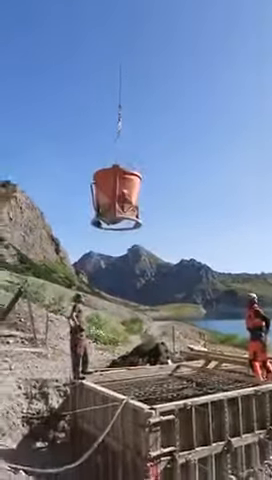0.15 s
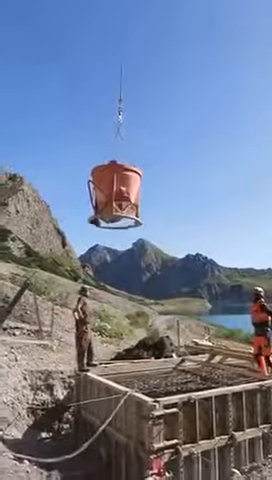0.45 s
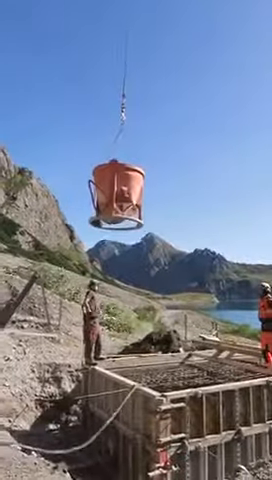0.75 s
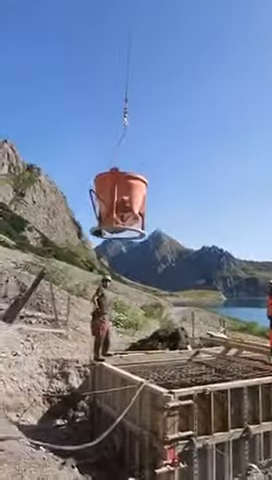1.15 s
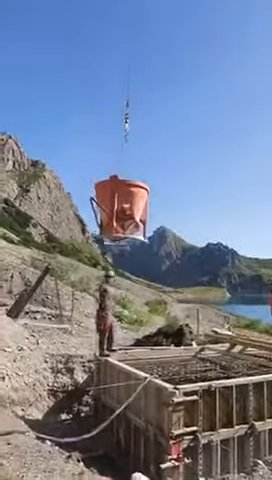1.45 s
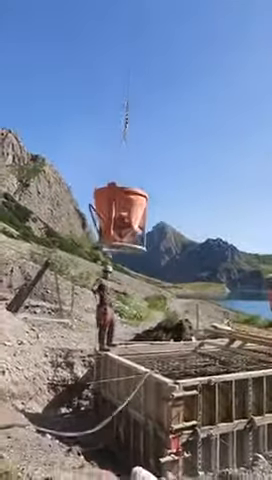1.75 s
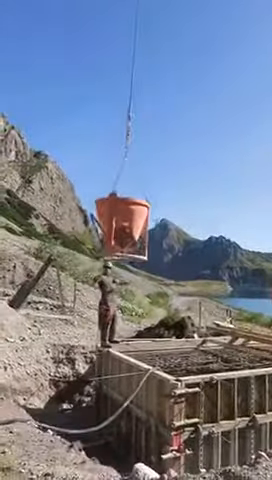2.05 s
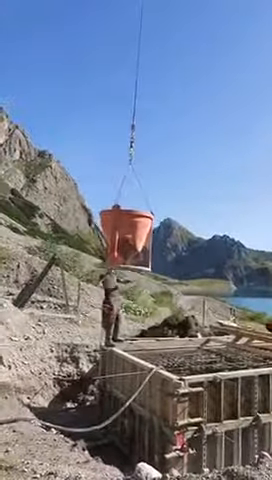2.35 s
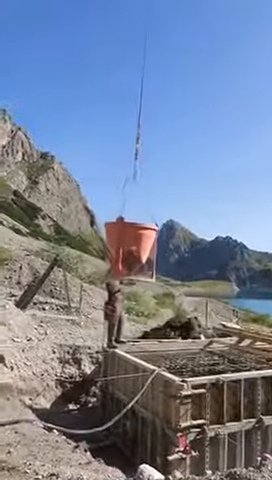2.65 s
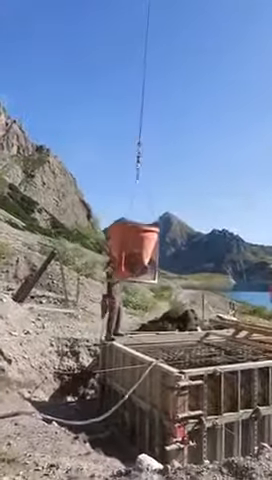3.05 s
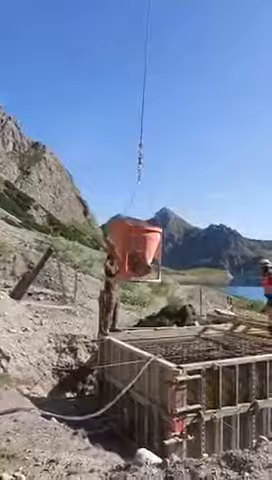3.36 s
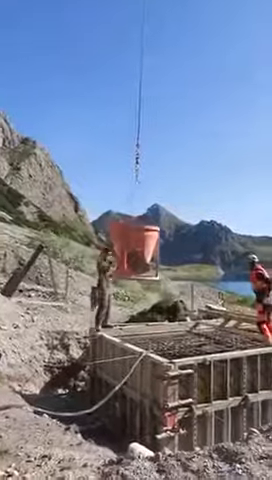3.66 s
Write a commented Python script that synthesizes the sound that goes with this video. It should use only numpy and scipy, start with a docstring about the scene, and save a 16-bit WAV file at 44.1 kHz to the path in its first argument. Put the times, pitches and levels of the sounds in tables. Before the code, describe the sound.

A helicopter hovers nearby throughout, a loud, crackly midrange roar fluttering about twenty times a second, with a short echo off rough ground. Downwash hits the phone at the start; low, wide wind buffeting follows from 0.15 to 0.7 s. Hard slaps stand out around 1.2 and 1.4 s. Gusts and hiss strengthen at 2-2.7 s, then dense, heavy slaps dominate until the end, with another brief gust near 3.6.

```python
"""A helicopter hovers over rough ground, heard at a hand-held phone.
Throughout, blade passes swell a crackly roar with fixed bright bands, hard slaps cut in, the ground echoes both,
and a wide hiss lies over all. From about 0.15 to 0.68 s low wind noise beats the two microphone ports unlike each
other; then the bass is held in the middle as a rumble. Downwash gusts tear at the phone at the start and again from
about 1 s; the hiss is strongest between 2 and 2.7 s. Sources are coloured noise and random cracks, moved in level."""
import sys
import numpy as np
from scipy import signal
from scipy.fft import rfft, irfft, next_fast_len
from scipy.io import wavfile
from scipy.ndimage import uniform_filter1d, map_coordinates

SR = 44100
rng = np.random.default_rng(int(sys.argv[2]) if len(sys.argv) > 2 else 0)


def level_to_linear(level):
    """Convert decibel levels to linear amplitude factors, elementwise."""
    exponent = np.asarray(level, float) / 20
    return 10 ** exponent


def store_pcm(level_fs):
    """Save levels as 16-bit WAV."""
    pcm = np.round(np.clip(level_fs, -1, 1) * 32767).astype(np.int16)
    wavfile.write(sys.argv[1], SR, np.atleast_2d(pcm).T)


N = 167139
SIZE = next_fast_len(N)
HZ = np.maximum(np.arange(SIZE // 2 + 1) * SR / SIZE, 1)
T = np.arange(N) / SR

# Spectrum of the rotor roar, with its bright bands. Each row: frequency in Hz, relative density in dB per Hz.
ROAR_COLOUR = [(35, -39), (60, -22.5), (150, -20.5), (290, -1), (450, 0), (700, 2.5), (800, -3.5),
               (900, -11.5), (1050, -7), (1165, -3.5), (1280, -8.5), (1440, -15.5), (1600, -10.5),
               (1700, -8.5), (1930, -16.5), (2190, -10.5), (2350, -16.5), (2500, -20), (2750, -19),
               (3350, -22.5), (5000, -35), (8300, -52.5), (11000, -73)]


def curve(table, axis=1):
    """One column of a table, joined by straight lines in time."""
    rows = np.array(table)
    return np.interp(T, rows[:, 0], rows[:, axis])


def over_hz(table, hz):
    """A (Hz, value) table read on a log-frequency axis."""
    rows = np.array(table)
    return np.interp(np.log(hz), np.log(np.maximum(rows[:, 0], 1)), rows[:, 1])


def unit(x):
    """Scaled to rms 1."""
    return x / np.sqrt(np.mean(x ** 2))


def walk(rate_hz):
    """Random levels held 1 / rate_hz seconds and slewed twice; rms 1."""
    hold = max(int(SR / rate_hz), 2)
    steps = np.repeat(rng.standard_normal(N // 20)[:N // hold + 1], hold)
    slewed = uniform_filter1d(uniform_filter1d(steps, hold), hold)
    return unit(slewed[:N])


def cracks():
    """Sparse random clicks of random size and sign, giving a crackly grain; rms 1."""
    cracks_per_s = 900
    chance = rng.random((N, 2))
    struck = chance[:, 0] < cracks_per_s / SR
    size = np.sqrt(-np.log(1 - chance[:, 1])) * struck
    return unit(size * rng.choice([-1, 1], N))


def noise(colour, move_db, extra=((1, 0),), crack_db=-60):
    """Noise and cracks, coloured to rms 1, then tilted by extra; move_db(Hz) moves each half-octave band."""
    source = rng.standard_normal(N) + level_to_linear(crack_db) * cracks()
    spectrum = rfft(source, SIZE) * level_to_linear(over_hz(colour, HZ))
    rms = np.sqrt(np.mean(irfft(spectrum, SIZE) ** 2))
    spectrum = spectrum * level_to_linear(over_hz(extra, HZ)) / rms
    out = 0
    for hz in 18 * 2. ** np.arange(0, 10, .5):
        share = np.clip(1 - 2 * abs(np.log2(HZ / hz)), 0, 1)
        out = out + irfft(spectrum * share, SIZE)[:N] * level_to_linear(move_db(hz))
    return out


def echoed(x):
    """Sound plus its close reflection off rough ground, dulled; the delay wanders as the phone sways."""
    # Ground reflections. Each row: delay in ms, level in dB, rms delay wander in ms, low-pass corner in Hz.
    echoes = [(8.75, -5, 0.15, 1380)]
    out = x
    for delay_ms, db, sway_ms, top_hz in echoes:
        wander_ms = delay_ms + sway_ms * walk(0.98)
        low_pass = signal.butter(2, top_hz, fs=SR, output="sos")
        dull = signal.sosfiltfilt(low_pass, x)
        late = map_coordinates(dull, [(T - wander_ms / 1000) * SR], order=1, mode="mirror")
        out = out + level_to_linear(db) * late
    return out


def hiss():
    """Smooth treble noise, stronger in the side than in the middle; a shared part leans it right."""
    # Hiss level. Each row: time in seconds, level in dB.
    hiss_levels = [(0, -52), (.2, -48.5), (.43, -68), (.62, -47.5), (.67, -58), (.75, -50.5), (1.05, -51.5),
                   (1.1, -49), (1.5, -43.5), (1.9, -42.5), (2.1, -38.5), (2.35, -37), (2.5, -39),
                   (2.64, -37), (2.68, -42), (3.3, -47), (3.6, -49), (3.79, -42.5)]
    # Hiss spectrum. Each row: frequency in Hz, relative density in dB per Hz.
    hiss_colour = [(1500, -16), (3000, -2), (4500, 0), (6000, -3), (8000, -6), (9500, -6), (11000, -4),
                   (11700, -8)]
    # Middle tilt. Each row: frequency in Hz, gain over the hiss spectrum in dB.
    mid_tilt = [(2500, -14), (4000, -4.5), (6000, -4), (8000, -4.5), (10000, -10)]
    lean = 0.23  # share of the side subtracted from the middle

    def move(hz):
        return 1.5 * walk(11)

    gain = level_to_linear(curve(hiss_levels))
    side = noise(hiss_colour, move)
    mid = noise(hiss_colour, move, mid_tilt) - lean * side
    return gain * mid, gain * side


def rumble():
    """Low wind noise in the middle, fading in over 30 ms once the bass is held there."""
    # Rumble level. Each row: time in seconds, level in dB.
    rumble_levels = [(.7, -47), (.85, -54), (1., -50), (1.08, -42.5), (1.3, -40.5), (1.6, -41.5),
                     (1.8, -34.5), (2.1, -40.5), (2.35, -36.5), (2.55, -37.5), (2.75, -38), (3., -44.5),
                     (3.2, -46.5), (3.5, -45), (3.79, -48)]
    # Rumble spectrum. Each row: frequency in Hz, relative density in dB per Hz.
    rumble_colour = [(12, -37), (30, -21), (60, -11), (150, 4.5), (250, -4), (330, -13), (600, -56.5)]
    fade = np.clip((T - rumble_levels[0][0]) / .03 + 1, 0, 1)
    return fade * level_to_linear(curve(rumble_levels)) * noise(rumble_colour, lambda hz: 3 * walk(12))


def port_wind():
    """Low buffeting by wind that beats each port on its own: independent middle and side noise."""
    # Buffeting levels. Each row: time in seconds, side level in dB, middle level in dB.
    wind_levels = [(0, -36, -45), (.13, -30.5, -22), (.15, -24.5, -28), (.18, -15.5, -19.5),
                   (.19, -16, -20), (.295, -13.5, -23), (.305, -21.5, -28.5), (.4, -21, -26.5),
                   (.48, -18.5, -25), (.55, -13, -23), (.64, -15.5, -20.5), (.665, -20.5, -25),
                   (.675, -48, -48), (.72, -82, -74.5)]
    # Side spectrum. Each row: frequency in Hz, relative density in dB per Hz.
    side_colour = [(15, -43), (25, -25.5), (149, 0), (287, -1), (468, -5), (555, -12.5), (1510, -26),
                   (3040, -39.5), (4000, -60), (5200, -75), (8800, -120)]
    # Middle spectrum. Each row: frequency in Hz, relative density in dB per Hz.
    mid_colour = [(20, -14.5), (50, -3.5), (130, -4), (250, -4.5), (500, -13.5), (1500, -31), (5000, -68)]
    beat_db = 1.3 * walk(41)

    def move(hz):
        return beat_db + 0.97 * walk(25.4)

    mid = level_to_linear(curve(wind_levels, axis=2)) * noise(mid_colour, move)
    side = level_to_linear(curve(wind_levels)) * noise(side_colour, move)
    return mid, side


def gusts():
    """Downwash tearing over the phone: crackly body in the middle, brighter edge wide; both share a beat."""
    # Gust levels. Each row: time in seconds, body level in dB, edge level in dB.
    gust_levels = [(0, -16.5, -45.5), (.17, -18, -48.5), (.25, -44, -50.5), (.8, -42, -57.5),
                   (1.08, -34, -48), (1.3, -25, -40), (1.55, -28, -37.5), (1.65, -23, -44.5),
                   (1.85, -23, -43.5), (1.97, -23, -41.5), (2.04, -19, -39), (2.12, -17.5, -34.5),
                   (2.2, -18.5, -33), (2.3, -18.5, -37.5), (2.38, -30.5, -49.5), (2.45, -15, -33),
                   (2.525, -14.5, -29.5), (2.58, -20, -34), (2.64, -19.5, -24.5), (2.68, -29, -49),
                   (3., -31, -42.5), (3.3, -20, -43.5), (3.57, -27.5, -47.5), (3.62, -19.5, -27.5),
                   (3.67, -22, -42.5), (3.79, -20.5, -34)]
    # Body spectrum. Each row: frequency in Hz, relative density in dB per Hz.
    body_colour = [(25, -30), (80, -15.5), (200, -3), (400, 4), (750, -3), (1000, -6.5), (2000, -16),
                   (4000, -30.5), (8000, -56)]
    # Edge spectrum. Each row: frequency in Hz, relative density in dB per Hz.
    edge_colour = [(200, -33), (500, -1.5), (1000, -1), (1800, 3.5), (3000, 2), (5000, -8), (10000, -16.5)]
    # Edge in the middle. Each row: frequency in Hz, gain over the edge spectrum in dB.
    edge_mid_tilt = [(1000, 8), (3000, -2), (5000, -1), (8000, -8.5)]
    beat_db = 2.1 * walk(70)

    def move_body(hz):
        return beat_db + 1.15 * walk(18)

    def move_edge(hz):
        return beat_db + 5.4 * walk(110)

    edge_gain = level_to_linear(curve(gust_levels, axis=2))
    body = level_to_linear(curve(gust_levels)) * noise(body_colour, move_body, crack_db=-5.5)
    edge_mid = edge_gain * noise(edge_colour, move_edge, edge_mid_tilt, crack_db=-1.5)
    edge_side = edge_gain * noise(edge_colour, move_edge)
    return body + edge_mid, edge_side


def slaps():
    """Hard blade slaps: tight clusters of cracks and noise with a quick rise and exponential decay."""
    # Slaps. Each row: start in seconds, level in dB before the common trim, decay time constant in ms.
    slap_rows = [(0.029, -16.5, 4), (0.066, -8.5, 5.5), (0.146, -26.5, 5.4), (0.181, -13.5, 6),
                 (0.514, -16, 8.7), (0.609, -12.5, 4.5), (0.724, -20.5, 6), (0.764, -17.5, 6.8),
                 (0.865, -20, 6), (0.962, -11.5, 12), (1.022, -16.5, 10), (1.067, -24.5, 4.4),
                 (1.124, -14.5, 7.3), (1.218, -2.5, 5.5), (1.261, -20, 6), (1.318, -9.5, 6.6),
                 (1.358, -19, 6), (1.418, -2.5, 6), (1.463, -19, 3.5), (1.516, -13, 6.7), (1.57, -7.5, 9.8),
                 (1.809, -11.5, 5.3), (1.864, -25, 4.8), (1.966, -8, 6.9), (2.03, -14.5, 5.4),
                 (2.061, -22.5, 5.2), (2.152, -11, 5.1), (2.232, -15, 7.5), (2.343, -15, 6),
                 (2.439, -11, 10), (2.527, -3.5, 7.3), (2.586, -5, 3.8), (2.691, -15, 4.7),
                 (2.744, -11.5, 14), (2.791, -6.5, 8.1), (2.839, -15.5, 7.4), (2.895, -12.5, 4.4),
                 (2.936, -1.5, 7.8), (2.997, -15.5, 4.7), (3.036, -7, 5.2), (3.086, -11, 6.7),
                 (3.131, -5, 8.3), (3.181, -4.5, 6), (3.231, -22.5, 5.4), (3.294, -5.5, 7.6),
                 (3.394, -14, 7.1), (3.44, -18, 6), (3.495, -13, 6.6), (3.544, -8.5, 6), (3.597, 0, 5),
                 (3.657, -14.5, 5), (3.74, -9.5, 6)]
    # Slap tilt. Each row: frequency in Hz, gain over the roar spectrum in dB.
    slap_tilt = [(200, -11.5), (600, 0), (2000, 6.5), (5000, -0.5)]
    trim_db, rise_ms, crack_db = -4, 2.66, 3
    white = unit(rng.standard_normal(N) + level_to_linear(crack_db) * cracks())
    colour = level_to_linear(over_hz(ROAR_COLOUR, HZ) + over_hz(slap_tilt, HZ))
    tinted = unit(irfft(rfft(white, SIZE) * colour, SIZE)[:N])
    burst = np.zeros(N)
    for start_s, db, decay_ms in slap_rows:
        age_ms = np.maximum(T - start_s, 0) * 1000
        gate = (1 - np.exp(-age_ms / rise_ms)) * np.exp(-age_ms / max(decay_ms, 1))
        slap = gate * tinted
        # same energy as the bare gate, whatever the noise under it
        even = np.sqrt(np.sum(gate ** 2) / np.sum(slap ** 2))
        burst += level_to_linear(db + trim_db) * slap * even
    return burst


def rotor():
    """Blade passes swell the roar, a little early or late, weak or strong; a fine crackle roughens it."""
    # Blade swell. Each row: time in seconds, roar level in dB, swell lateness in ms, cosine amplitude in dB
    # before the share by frequency.
    rotor_rows = [(0, -21, 10, 3), (.09, -24.5, 13, 1.5), (.17, -18.5, 17, 3), (.27, -26, 17, 3),
                  (.38, -25, 20, 3), (.5, -22.5, 15, 3.5), (.62, -23.5, 11, 3), (.75, -23, 13, 3.5),
                  (.95, -22.5, 9.6, 4.5), (1.15, -21.5, 15, 2.5), (1.35, -21, 6, 5), (1.45, -19.5, 13, 4.5),
                  (1.55, -20, 11.3, 4.5), (1.65, -21, 15, 2.5), (1.75, -24, 14, 4.5),
                  (1.95, -21.5, 3.9, 3.5), (2.15, -29, 11, 5), (2.35, -19, 7, -0.5), (2.55, -19.5, 17, -2),
                  (2.75, -16.5, 12.7, 6.5), (2.95, -15, 22.4, 3), (3.15, -15.5, 22, 1),
                  (3.35, -19.5, 13, 7), (3.55, -16, 13.5, 5), (3.79, -20, 16, 4.5)]
    # Swell by frequency. Each row: frequency in Hz, share of the swell and crackle.
    swell_share = [(100, 0.1), (350, 1.17), (2000, 1.22), (5000, 0.56), (9000, 1.7)]
    # Roar body. Each row: time in seconds, boost in dB before the share by frequency.
    body_boost = [(0, 12), (.2, 1.5), (.3, 4), (.7, -1), (1.3, -2), (1.9, -1.5), (2.4, -4.5), (2.7, -2),
                  (3.1, -2.5), (3.4, -4.5), (3.79, 0.5)]
    # Body by frequency. Each row: frequency in Hz, share of the boost.
    body_share = [(120, 0.43), (300, 1), (750, 0.92), (1000, 0), (2000, 0.035)]
    # Side tilt. Each row: frequency in Hz, gain over the roar spectrum in dB.
    side_tilt = [(300, -38.5), (600, -63), (1100, -44.5), (2000, -33.5), (3500, -12.5), (6000, 3.5),
                 (10000, -1.5)]
    blade_hz = 19.8
    scatter_db, scatter_ms, drift_db = .5, 1.5, 1.1
    crackle_db, crackle_hz = 1.3, 159.1
    second_harmonic = 0.085  # sharpens the swell

    turns = (T - curve(rotor_rows, axis=2) / 1000) * blade_hz  # one turn = one blade pass
    chance = rng.standard_normal((100, 2))  # timing, strength of each pass
    blade = np.round(turns).astype(int) + 1
    phase = turns - np.round(turns)
    near = np.cos(np.pi * phase) ** 2
    late = chance[blade, 0] * scatter_ms / 1000 * blade_hz * near
    angle = 2 * np.pi * (phase - late)
    shape = np.cos(angle) + second_harmonic * np.cos(2 * angle)
    swell_db = curve(rotor_rows, axis=3) * shape + scatter_db * chance[blade, 1] * near
    shared_db = swell_db + crackle_db * walk(crackle_hz)
    body_db = curve(body_boost)

    def move(hz):
        passing = over_hz(swell_share, hz) * (shared_db + 1.5 * walk(200))
        drift = drift_db * walk(14)
        return passing + drift + over_hz(body_share, hz) * body_db

    mid = echoed(noise(ROAR_COLOUR, move, crack_db=-2))
    gain = level_to_linear(curve(rotor_rows)) / np.sqrt(np.mean(mid ** 2))
    side = noise(ROAR_COLOUR, move, side_tilt)
    return gain * mid, gain * side


def scene():
    """Middle and side of all layers, turned into left and right."""
    mid, side = np.sum([hiss(), port_wind(), gusts(), rotor()], axis=0)
    mid = mid + rumble() + echoed(slaps())
    return np.array([mid + side, mid - side])


def band_limit(x):
    """A steep low-pass at the top of the band."""
    return signal.sosfilt(signal.butter(12, 11480, fs=SR, output="sos"), x)


def record(dry):
    """The phone rounds the loudest peaks by tanh; the middle loses its top, the side keeps it."""
    left, right = np.tanh(0.78 * dry) / 0.87
    low_pass = signal.butter(6, 9960, fs=SR, output="sos")  # corner in Hz
    mid = signal.sosfiltfilt(low_pass, left + right) / 2
    side = (left - right) / 2
    return band_limit(np.array([mid + side, mid - side]))


dry = scene()
out = record(dry)
store_pcm(out)
```